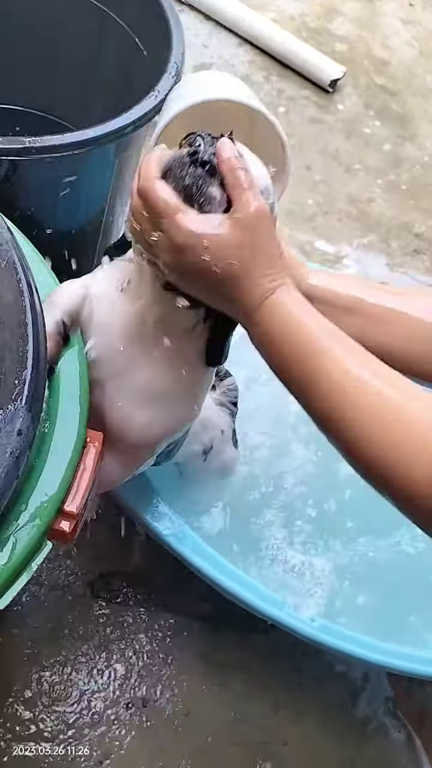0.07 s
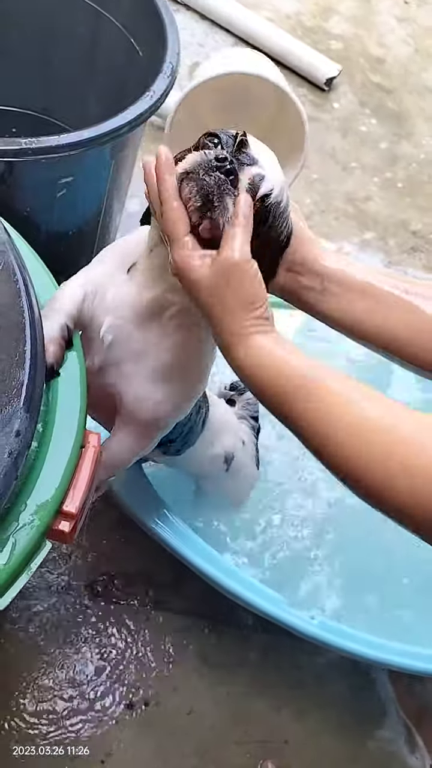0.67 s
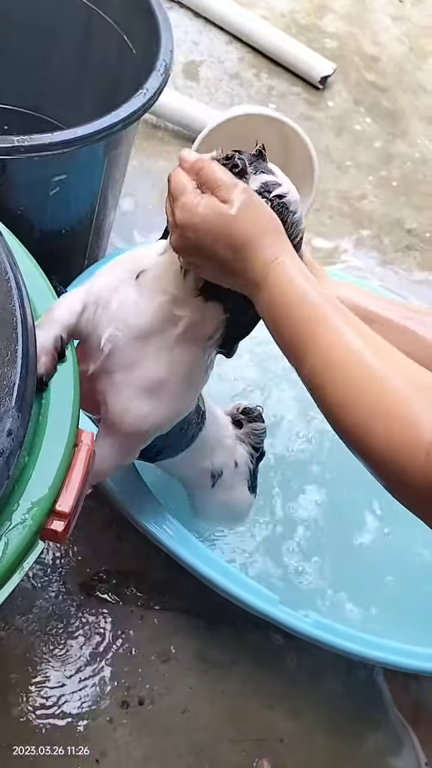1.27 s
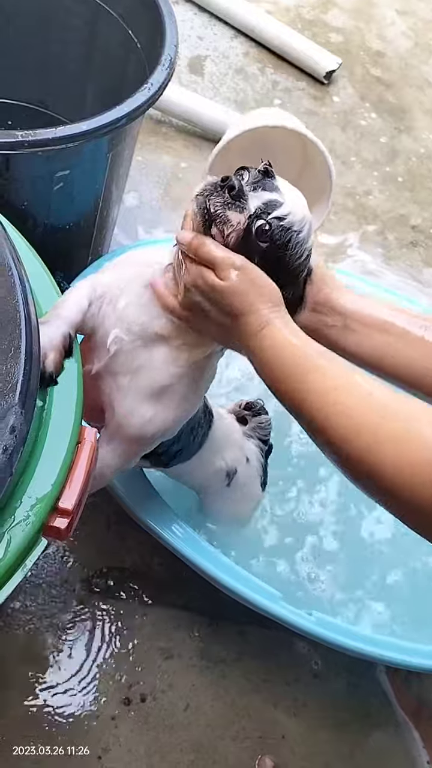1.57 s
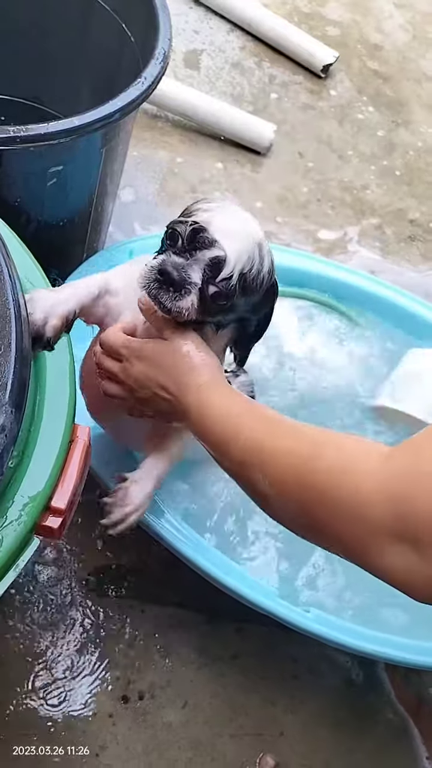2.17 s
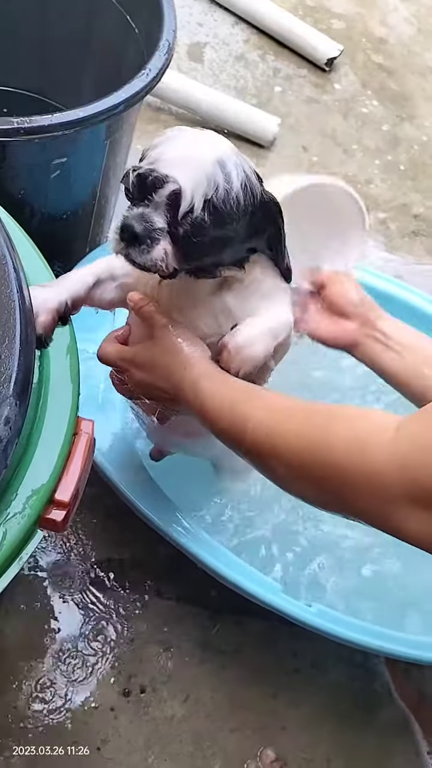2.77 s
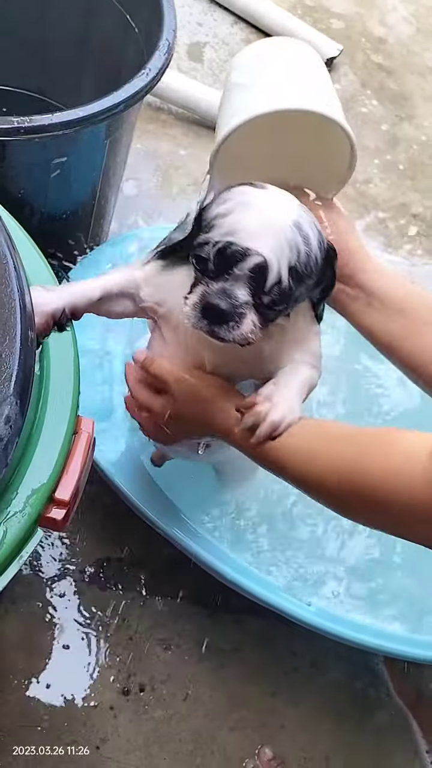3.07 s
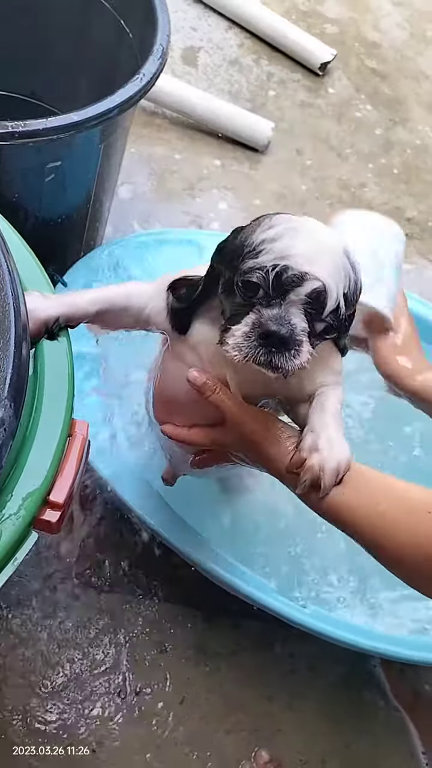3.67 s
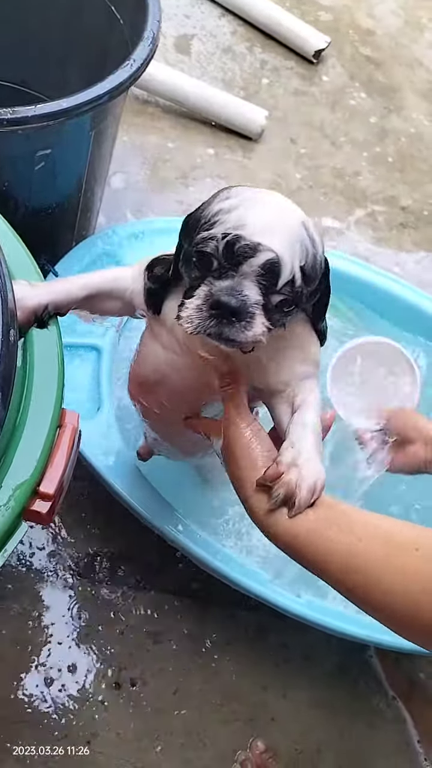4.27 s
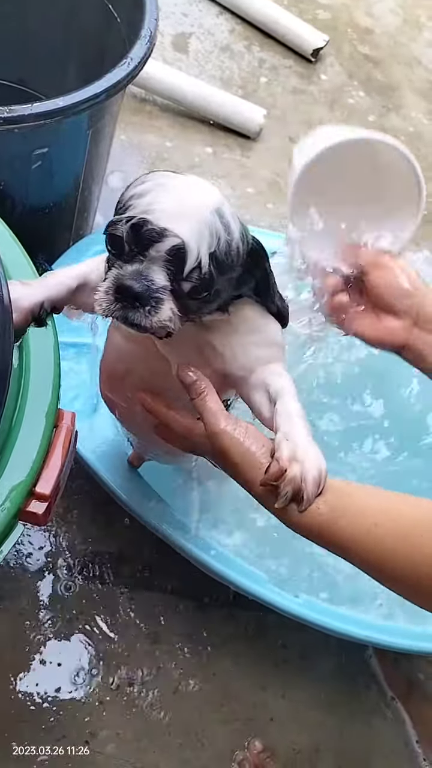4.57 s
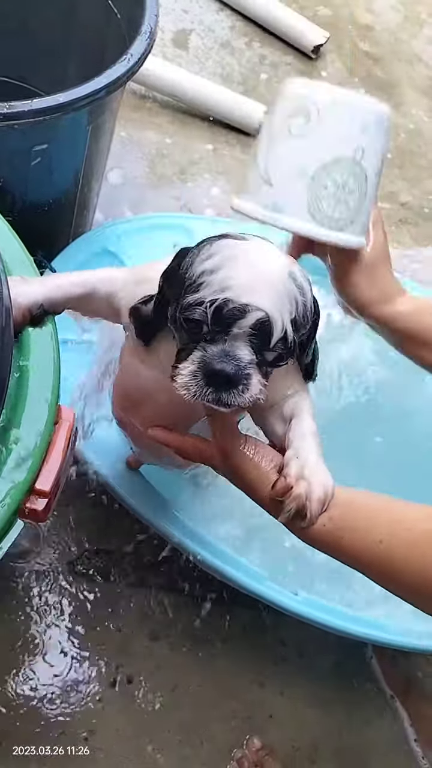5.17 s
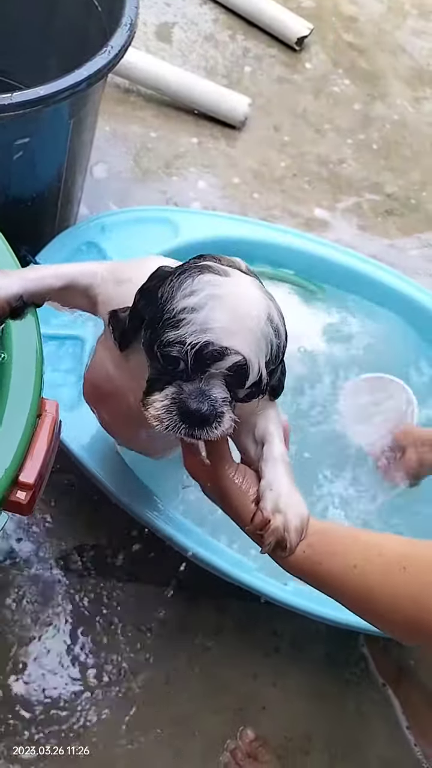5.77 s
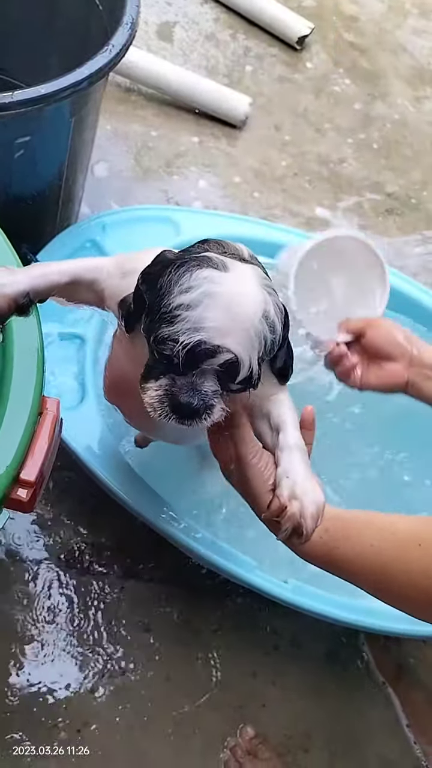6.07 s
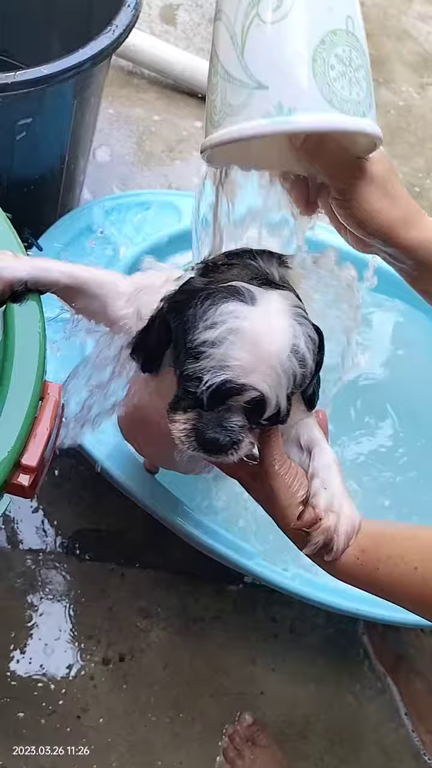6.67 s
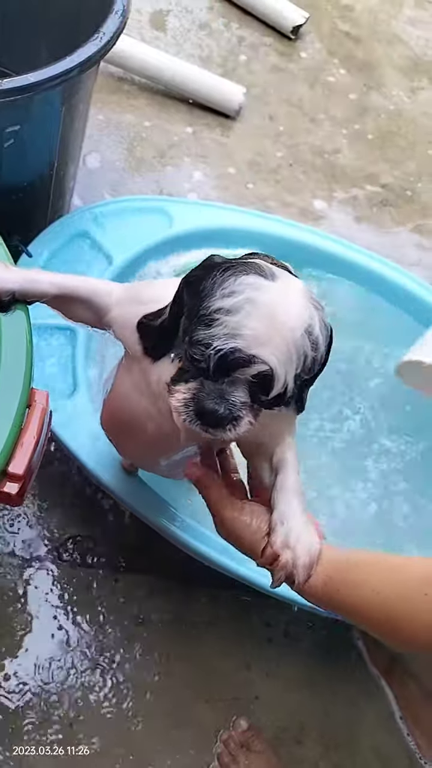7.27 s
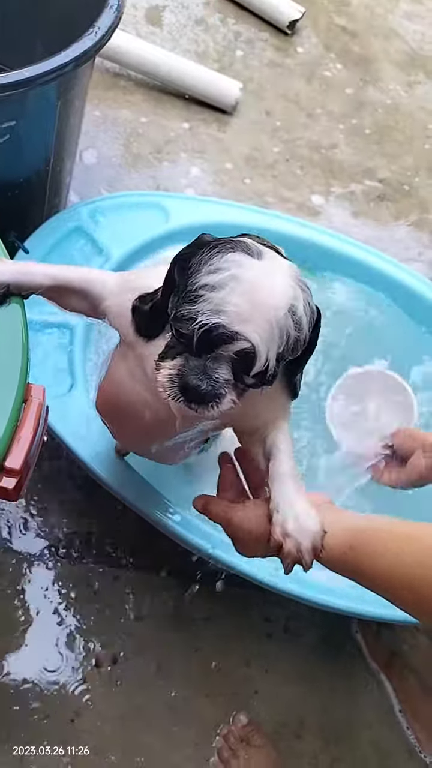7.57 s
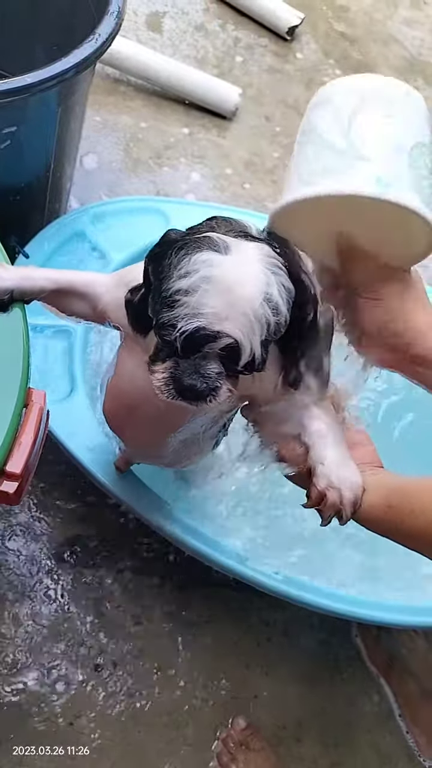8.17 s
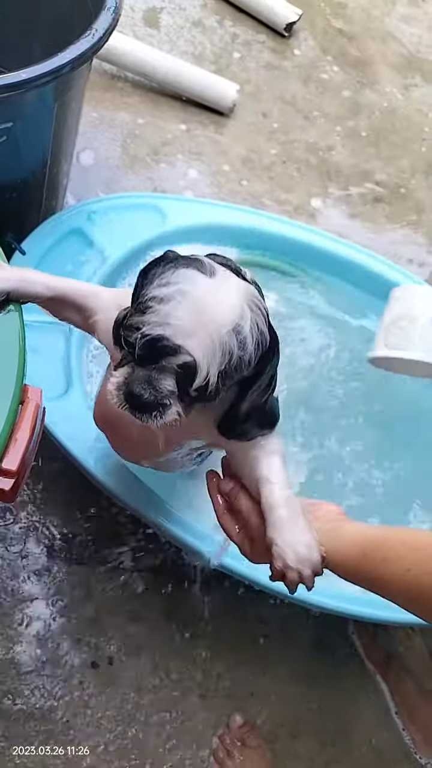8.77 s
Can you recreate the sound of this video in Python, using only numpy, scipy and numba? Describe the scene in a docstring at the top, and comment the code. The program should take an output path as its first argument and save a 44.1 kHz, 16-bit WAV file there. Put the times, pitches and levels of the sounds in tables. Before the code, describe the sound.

Wet hands squelch over fur, then water is scooped and poured into a plastic tub several times, splashing and dripping.

```python
"""Water trickles off a puppy and wet hands squelch over its fur, in a shallow plastic tub in a concrete yard.
Then a dipper is plunged into the tub and emptied over the dog four times; run-off drips in between.
Drops radiate by impact and by the bubbles they entrain. Each bubble is a damped oscillator, the
larger the lower, so that spray hisses and the heaving bath gurgles. The tub hums at its normal
modes, nearby surfaces reflect the splashes, and a faint outdoor murmur lies behind it all."""
import sys
import numpy as np
from scipy import signal
from scipy.fft import rfft, irfft
from scipy.io import wavfile
from scipy.ndimage import uniform_filter1d
from numba import njit

SR = 44100
rng = np.random.default_rng(int(sys.argv[2]) if len(sys.argv) > 2 else 0)


def store_wav(level_fs):
    """Save 16-bit WAV to argv[1]."""
    pcm = np.round(np.clip(np.atleast_2d(level_fs), -1, 1) * 32767)
    wavfile.write(sys.argv[1], SR, pcm.T.astype(np.int16))


N = 392931
TIME = np.arange(N) / SR


def from_db(db):
    return 10 ** (np.asarray(db) / 20)


def unit_rms(x):
    return x / np.sqrt(np.mean(x ** 2) + 1e-20)


def power_sum(*levels_db):
    """Incoherent sources add in power."""
    return 10 * np.log10(sum(from_db(db) ** 2 for db in levels_db) + 1e-12)


def add(out, start_s, sound):
    at = int(np.clip(start_s * SR, 0, N - 1))
    out[at:at + len(sound)] += sound[:N - at]


def butter(x, order, hz, kind):
    return signal.sosfilt(signal.butter(order, hz, kind, fs=SR, output="sos"), x)


def convolve(x, impulse):
    return signal.oaconvolve(x, impulse)[:len(x)]


def response(spectrum, size=1024):
    """Minimum-phase impulse response of unit energy, by folding the cepstrum."""
    hz, db = np.transpose(spectrum)
    grid = np.maximum(np.fft.rfftfreq(size, 1 / SR), 1)
    magnitude = from_db(np.interp(np.log(grid), np.log(hz), db))
    cepstrum = irfft(np.log(magnitude))
    cepstrum[1:size // 2] *= 2
    cepstrum[size // 2 + 1:] = 0
    return unit_rms(irfft(np.exp(rfft(cepstrum)))) / np.sqrt(size)


def evened(x, span_s):
    """Division by the running rms steadies the level and keeps the fine grain."""
    size = int(span_s * SR)
    power = uniform_filter1d(uniform_filter1d(x * x, size), size)
    return x / np.sqrt(np.abs(power) + 1e-12)


def drift(per_s):
    """Random modulation: Gaussian values joined by straight lines."""
    return np.interp(TIME * per_s, np.arange(4000), rng.standard_normal(4000))


def impacts(per_s, spread_db):
    """A Poisson process of clicks: many small, a few large."""
    sizes = from_db(spread_db * np.minimum(rng.exponential(1, N), 4.5)) * rng.choice([-1, 1], N)
    return sizes * (rng.random(N) < per_s / SR)


@njit
def rising_rings(clicks, step, cycles, rise):
    """Damped oscillation: each click starts a rising sine (step in rad/sample) that decays by 60 dB."""
    out = np.zeros(len(clicks))
    for at in np.nonzero(clicks)[0]:
        size = min(int(cycles * 2 * np.pi / step[at]) + 1, len(clicks) - at)
        height, loss = clicks[at] * np.sqrt(step[at]), np.exp(-np.log(1000) / size)
        for i in range(size):
            angle = step[at] * i
            onset = min(angle / (2 * np.pi), 1.0)
            out[at + i] += height * onset * np.sin(angle * (1 + rise * i / size / 2))
            height *= loss
    return out


def bubble_cloud(clicks, low_hz, high_hz, cycles, rise):
    """Minnaert resonance: each click traps a bubble of random size, and so of random pitch."""
    hz = low_hz * (high_hz / low_hz) ** rng.random(N)
    return rising_rings(clicks, 2 * np.pi * hz / SR, float(cycles), float(rise))


# Water running off dog and dipper: t/s, spray level/dB, gurgle level/dB, tick level/dB
RUNOFF_LEVELS = [(0.0, -41, -70, -53), (0.22, -51, -68, -57), (0.65, -62, -66, -68.5),
                 (1.1, -63.5, -78, -90), (2.08, -80, -70, -84), (2.15, -40, -57, -63),
                 (2.49, -45, -46, -70), (2.62, -43, -48, -60.5), (4.03, -39.5, -46.5, -66),
                 (4.22, -44.5, -45, -67), (4.45, -38.5, -47.5, -62.5), (4.95, -41.5, -76, -54),
                 (5.72, -44, -63, -63), (5.9, -46.5, -57.5, -76), (6.45, -47.5, -54, -61),
                 (7.42, -47.5, -55, -68), (7.95, -46, -51, -76), (8.91, -42.5, -65.5, -55)]
def runoff(dribble_db=3.0):
    """Unsteady flow: levels of spray, gurgle and ticks, with the spray fluctuating at random."""
    times, *columns = np.transpose(RUNOFF_LEVELS)
    spray_db, gurgle_db, tick_db = [np.interp(TIME, times, column) for column in columns]
    return spray_db + dribble_db * drift(18), gurgle_db, tick_db


# Spectral density of spattering water: f/Hz, level/dB
SPRAY_SPECTRUM = [(60, -49), (300, -11), (700, -15), (1300, -14), (1950, -7.5), (2600, -5.5), (3900, -2),
                  (4800, -5.5), (5900, -2), (7400, -6.5), (9400, -23), (11000, -17.5), (11900, -9),
                  (13000, -11), (15500, -4)]
def spray(spray_db):
    """Bubble entrainment by drops on water, fur and concrete; a stronger flow is denser and brighter."""
    per_s = 1200 * from_db(.65 * (spray_db + 40.5))
    pops = bubble_cloud(impacts(per_s, spread_db=7.5), 1130, 8220, cycles=18, rise=0.19)
    plinks = bubble_cloud(impacts(.5 * per_s, spread_db=4.0), 2267, 7800, cycles=32, rise=0.066)
    fizz = bubble_cloud(impacts(.5 * per_s, spread_db=5.0), 6800, 15870, cycles=4.8, rise=0.3)
    drops = unit_rms(plinks) + from_db(-2) * unit_rms(pops) + from_db(2) * unit_rms(fizz)
    colour = response(SPRAY_SPECTRUM)
    grains = evened(convolve(drops, colour), span_s=0.12)
    mist = from_db(-9) * convolve(rng.standard_normal(N), colour)
    water = (grains + mist) * from_db(0.87 * drift(130))  # the stream breaks into lumps
    treble = butter(water, 1, 6000, "high")
    treble_db = np.clip(spray_db + 19, -15, 5) + 2.5 * drift(45)  # the treble flickers
    return from_db(spray_db) * (water + treble * (from_db(treble_db) - 1))


# Spectral density of a droplet's impact: f/Hz, level/dB
TICK_SPECTRUM = [(200, -35), (2000, -56), (4000, -9), (5900, 8.5), (7400, 15), (9400, -8.5), (12000, 0.5),
                 (15500, -5)]
def ticks(tick_db):
    """Impact noise: stray droplets strike the wet concrete, more often at higher levels."""
    per_s = 60 * from_db(0.43 * (tick_db + 58))
    clicks = impacts(per_s, spread_db=2.0) / np.sqrt(per_s)
    return from_db(tick_db) * unit_rms(convolve(clicks, response(TICK_SPECTRUM)))


# Spectral density of the outdoor background: f/Hz, level/dB
MURMUR_SPECTRUM = [(20, -2), (60, -3), (110, 7), (200, 8), (300, 9), (600, 3), (1100, 1), (2000, -10),
                   (4000, -9), (7000, -17), (9500, -26), (15500, -23)]
def murmur(level_db=-59.5):
    """Stationary ambient noise, strongest at low frequencies."""
    return from_db(level_db) * convolve(rng.standard_normal(N), response(MURMUR_SPECTRUM, size=4096))


# Single drops and squelches: t/s, level over 10 ms/dB, centre f/Hz, bandwidth/octaves, T60/s
SPLAT_EVENTS = [(0.0085, -33.5, 4600, 0.43, 0.014), (0.1371, -27, 2950, 0.45, 0.013),
                (0.243, -47, 5970, 0.45, .02), (0.2975, -39.5, 4430, 0.34, 0.021),
                (0.3223, -33.5, 3240, 0.29, .02), (0.413, -38.5, 3870, 0.12, 0.011),
                (0.442, -42.5, 5840, 1, .018), (0.508, -45.5, 3550, .7, .03),
                (0.565, -44.5, 5640, 1.1, 0.011), (0.7923, -51, 2010, 2.4, 0.019),
                (0.845, -46, 3060, 0.72, 0.02), (1.048, -45.5, 7030, .2, .037),
                (1.306, -36.5, 5600, 0.62, .013), (1.397, -50, 5460, 2.1, 0.077),
                (1.4215, -38.5, 5530, 0.77, 0.039), (1.5374, -55, 5410, 0.83, 0.025),
                (1.715, -45, 2200, 1.8, 0.036), (1.9052, -43, 6100, .5, 0.028),
                (2.0045, -56, 6000, 0.28, 0.017), (2.0763, -47, 6500, 0.56, .02),
                (2.1331, -33, 3500, 0.57, 0.017), (2.219, -29.5, 3060, 0.64, 0.025),
                (2.251, -30, 5580, 0.6, 0.014), (2.327, -35.5, 2950, 0.75, .044),
                (2.3555, -27.5, 3420, 3.2, 0.085), (2.382, -24.5, 2900, 1.3, 0.046),
                (2.5494, -32, 2780, 0.95, 0.016), (2.595, -31, 3860, 1.3, .04),
                (2.612, -29, 1900, 0.95, 0.014), (3.4062, -30, 3190, 1.4, 0.049),
                (3.5327, -24, 3750, 0.99, 0.023), (3.6795, -24, 4000, 1, .03),
                (3.7234, -24, 3000, 2.7, 0.032), (3.757, -25.5, 4120, 1.3, 0.017),
                (4.027, -30, 3530, 1, .01), (4.0759, -25.5, 3500, 2.8, 0.17),
                (4.297, -29.5, 2980, 0.91, 0.011), (4.3902, -37.5, 1770, 0.27, 0.025),
                (4.513, -34, 2620, 0.55, 0.028), (4.852, -31, 3470, 0.33, 0.019),
                (4.8862, -31.5, 3550, 1.1, 0.018), (4.981, -41, 3120, 1.5, .028),
                (5.0902, -23, 4070, 0.73, 0.011), (5.1811, -29, 3380, 0.95, 0.033),
                (5.3935, -26.5, 4290, 1.2, 0.038), (5.5076, -30, 2970, 1.7, .054),
                (5.741, -31.5, 3300, 1.7, 0.094), (5.785, -27, 4300, 0.82, 0.027),
                (5.9963, -36, 5500, 0.5, 0.027), (6.467, -46, 2740, 0.2, 0.019),
                (6.5173, -40.5, 3600, 0.85, .036), (6.5966, -34, 3900, 0.39, 0.0084),
                (6.645, -35, 2240, 1, 0.11), (6.714, -33, 2250, 0.87, 0.038), (6.748, -29, 4240, .7, 0.026),
                (6.945, -20.5, 4350, .9, .009), (7.0074, -24.5, 3660, 0.34, 0.0065),
                (7.057, -23, 4600, 0.83, 0.022), (7.345, -38, 3700, 0.95, 0.037),
                (7.4885, -31.5, 2950, 2, 0.07), (7.5123, -33, 4930, .6, 0.054),
                (7.6801, -42.5, 2740, 2, .03), (7.824, -36.5, 2470, 0.95, 0.47),
                (7.9031, -40.5, 2380, 1, .014), (8.131, -33.5, 3300, 1.2, 0.17),
                (8.203, -37, 5000, 1.2, 0.043), (8.2154, -27, 4440, 0.77, 0.023),
                (8.266, -32, 4280, .6, 0.016), (8.5065, -20, 2820, 1.2, 0.081),
                (8.6573, -29, 3180, 2, .028), (8.704, -24.5, 2600, 1.2, .015),
                (8.7667, -23.5, 4030, 0.92, 0.02), (8.8087, -28.5, 3300, 1.6, 0.025),
                (8.882, -34.5, 4740, .7, 0.029)]
def splats(attack_share=0.035, crack_db=-6.5, lumpy_db=3.5):
    """Transient radiation: a drop or a squeezed film of water bursts with a crack and an uneven rush."""
    out, t, colour = np.zeros(N), np.arange(4096) / SR, response(SPRAY_SPECTRUM)
    for start, db, hz, octaves, t60 in SPLAT_EVENTS:
        lumps = from_db(lumpy_db * np.interp(t, np.linspace(0, t[-1], 90), rng.standard_normal(90)))
        envelope = (1 - np.exp(-t / (attack_share * t60))) * from_db(-60 * t / t60)
        rush, snap = rng.standard_normal((2, len(t))) * lumps * envelope
        edges_hz = np.clip(hz * 2 ** (np.array([-.5, .5]) * max(octaves, .15)), 100, SR / 2.3)
        body = butter(convolve(rush, colour), 2, edges_hz, "band")
        crack = convolve(snap, response(TICK_SPECTRUM))
        sharpness = hz / 4000 * np.clip(octaves, .2, 1)  # low or ringing drops hardly crack
        burst = unit_rms(body) + from_db(crack_db) * sharpness * unit_rms(crack)
        add(out, start, from_db(db) * burst / np.linalg.norm(burst) * np.sqrt(SR / 100))
    return out


def gesture(peak_s, hold_s, swell_db_per_s, fade_db_per_s):
    """Exponential growth, a hold and exponential decay, in dB relative to the peak."""
    before, after = np.maximum(peak_s - TIME, 0), np.maximum(TIME - peak_s - hold_s, 0)
    return -swell_db_per_s * before - fade_db_per_s * after


# Heaves of the bath: t/s, gurgle level/dB, slosh level/dB, hum level/dB, decay/(dB/s)
HEAVE_EVENTS = [(0.02, -72, -58, -52, 17), (0.57, -60.5, -64, -73, 48), (2.358, -44, -47, -59, 55),
                (2.64, -39.5, -59, -55, 39), (3.07, -45, -67, -76, 47), (4.085, -44.5, -46.5, -56, 89),
                (4.469, -54, -78, -54, 4), (5.77, -47.5, -46, -49, 62), (7.479, -41, -43.5, -48.5, 56),
                (8.33, -53, -71, -51.5, 21), (8.57, -42.5, -44, -63, 77)]
def heaving(hold_s=0.026, swell_db_per_s=650):
    """Free decay: gurgle, slosh and hum levels jump as the dipper plunges or the dog shifts, then sink."""
    shapes = [gesture(peak_s, hold_s, swell_db_per_s, fade) for peak_s, *_, fade in HEAVE_EVENTS]
    columns = np.transpose(HEAVE_EVENTS)[1:-1]
    return [power_sum(*[db + shape for db, shape in zip(levels, shapes)]) for levels in columns]


def churn(churn_db):
    """Air entrainment: moving water drags under a gurgling cloud of middle-sized bubbles."""
    clicks = impacts(400 * from_db(.5 * (churn_db + 45.5)), spread_db=3.0)
    return gurgle(clicks) * from_db(churn_db - 0.5)


# Spectral weighting of the gurgling bubbles: f/Hz, level/dB
GURGLE_SPECTRUM = [(80, -38), (350, -43), (600, -9.5), (900, -7), (1400, -2), (1900, -16.5), (3000, -30.5)]
def gurgle(clicks):
    """Superposition: overlapping bubble resonances merge into a gurgle of steady level."""
    cloud = bubble_cloud(clicks, 519.6, 2088, cycles=44.7, rise=0.24)
    return evened(convolve(cloud, response(GURGLE_SPECTRUM)), span_s=0.32)


def slosh(slosh_db):
    """Cavity resonance: waves fold over large pockets of air, which ring low."""
    cloud = bubble_cloud(impacts(240, spread_db=6.0), 281.4, 566, cycles=37, rise=0.071)
    return from_db(slosh_db) * evened(butter(cloud, 2, 270, "high"), span_s=0.29)


# Normal modes of the hollow tub: f/Hz, bandwidth/Hz, level/dB
TUB_MODES = [(205, 23, -2), (112.3, 6.4, -18)]
def tub(hum_db):
    """Forced vibration: rocking water drives each mode, a two-pole resonator, with noise."""
    hum = np.zeros(N)
    for hz, width_hz, db in TUB_MODES:
        radius, angle = np.exp(-np.pi * width_hz / SR), 2 * np.pi * hz / SR
        gain = np.sin(angle) * np.sqrt(1 - radius ** 2)
        feedback = [1, -2 * radius * np.cos(angle), radius ** 2]
        mode = signal.lfilter([gain], feedback, rng.standard_normal(N))
        hum += from_db(db) * evened(mode, span_s=0.36)
    return from_db(hum_db) * butter(hum, 4, 112, "high")


# Single large bubbles: t/s, peak level/dB, f/Hz, T60/cycles, fractional rise in f
BUBBLE_EVENTS = [(0.137, -23, 2036, 45, 1.4), (0.44, -53, 563, 68, 1.7), (0.47, -50, 1216, 85, 1.2),
                 (0.575, -44.5, 550, 54, 0), (0.588, -43, 958, 110, 0), (0.652, -45.5, 578, 56, 0),
                 (0.798, -39, 1390, 19, 0.084), (1.219, -42.5, 1210, 37, 0.14),
                 (1.72, -37.5, 1350, 30, 2.8), (1.859, -32.5, 1173, 48, 1.7), (1.862, -39, 380, 28, 0.59),
                 (1.863, -27, 710, 11, .3), (1.883, -35, 1036, 40, 0.023), (2.326, -28.5, 402.5, 130, 0.29),
                 (2.357, -16.5, 415.6, 51, 0), (2.37, -14, 455, 25, 0.56), (2.41, -24.5, 543, 39, .3),
                 (2.607, -30, 406, 40, 0.052), (2.611, -22, 1356, 38, 0.29), (2.655, -25.5, 950, 29, 0.17),
                 (2.705, -19.5, 1030, 47, 0), (2.759, -28.5, 1360, 55, 0.77), (2.882, -38, 408, 33, 0.39),
                 (2.899, -28, 628, 38, 0.061), (3.082, -27, 654, 30, 0), (3.43, -31.5, 583, 64, 0),
                 (3.597, -38, 398, 73, 0.57), (3.725, -18, 1590, 28, 2.5), (3.789, -32, 373, 25, .3),
                 (4.072, -28.5, 344, 27, 0.98), (4.073, -15.5, 581, 31, 0.54), (4.389, -33, 1760, 49, 0.58),
                 (4.485, -33, 557, 47, 0), (4.6, -33.5, 1180, 26, 0), (4.626, -37.5, 870, 89, 0),
                 (4.741, -35.5, 1310, 45, 0.83), (4.868, -32.5, 1007, 74, 0.11),
                 (4.942, -27, 892, 34, 0.074), (5.16, -26.5, 1015, 77, 0.042), (5.581, -35, 1370, 41, 0.45),
                 (5.751, -33.5, 1388, 45, 0.43), (5.739, -33.5, 490, 8, 0.26), (5.783, -30, 520, 19, 0.6),
                 (5.827, -28, 560, 15, 0), (5.935, -19, 614, 13, 0.094), (6.253, -35.5, 1170, 110, 0.66),
                 (6.262, -36, 800, 79, 1.4), (6.417, -34.5, 980, 37, .1), (6.653, -33.5, 940, 64, 0.66),
                 (6.718, -20.5, 709, 114, 0.018), (6.755, -29, 962, 47, 0.0022),
                 (6.923, -10.5, 1454, 14, 0), (7, -33, 354, 36, 0.082), (7.461, -28, 684, 36, 0.35),
                 (7.514, -36, 414, 12, 0.17), (7.568, -29, 880, 50, 0.91), (7.622, -32.5, 537, 54, 0.85),
                 (7.667, -30, 1260, 77, .4), (8.294, -22.5, 907, 17, 0.12), (8.506, -20, 1325, 34, 1),
                 (8.542, -18.5, 1594, 29, 0.29), (8.628, -20.5, 1194, 64, 1.33)]
def bubbles(opening_cycles=0.77, wobble_rad=.13, wash_db=-13.0, wash_t60=0.18):
    """Volume pulsation: a bubble rings, wobbles and rises; water closing over it washes near its pitch."""
    out, t = np.zeros(N), np.arange(SR // 4) / SR
    for start, db, hz, cycles, rise in BUBBLE_EVENTS:
        t60, opening_s = cycles / hz, opening_cycles / hz + 1 / 600
        envelope = from_db(-60 * t / t60) * (1 - np.exp(-(t / opening_s) ** 2))
        glide_hz = hz * (1 + rise * (np.minimum(t / t60, 1) - .13))
        wobble = wobble_rad * np.interp(t * hz / 2, np.arange(300), rng.standard_normal(300))
        note = envelope / envelope.max() * np.sin(2 * np.pi * np.cumsum(glide_hz) / SR + wobble)
        rush = rng.standard_normal(len(t)) * from_db(-60 * t / wash_t60)
        wash = butter(rush, 2, [hz * .8, hz * 1.35], "band")
        wash *= from_db(wash_db) * np.linalg.norm(note) / np.linalg.norm(wash)
        add(out, start - .001, from_db(db) * (note + wash))
    return out


# Pours from the dipper: t/s at full stream, hold/s, level/dB, growth/(dB/s), decay/(dB/s)
POUR_EVENTS = [(3.519, 0.29, -25.5, 21, 91), (5.269, .12, -26, 46.5, 69), (6.879, 0.2, -24.5, 86, 165),
               (8.482, 0.21, -25, 70, 131)]
def pouring(sag_db_per_s=5):
    """Gravity flow: the spray level swells as the dipper tips, sags as it empties, then breaks off."""
    pours = [db + gesture(full_s, hold_s, swell, fade) - sag_db_per_s * np.clip(TIME - full_s, 0, hold_s)
             for full_s, hold_s, db, swell, fade in POUR_EVENTS]
    return power_sum(*pours)


# Early reflections from tub wall and ground: delay/s, amplitude ratio
REFLECTIONS = [(.00052, 0.088), (.00228, 0.43), (.0046, .14), (.0092, 0.12)]
def yard(water, t60=0.15, wet_db=0.5, onset_s=0.00067, spots_per_s=23, spots=8):
    """Reflection and scattering: near echoes, then a diffuse tail that varies with where water lands."""
    t = np.arange(SR // 4) / SR
    near = np.zeros(len(t))
    near[0] = 1
    for delay_s, gain in REFLECTIONS:
        near[int(delay_s * SR)] += gain
    out = convolve(water, near)
    for spot in range(spots):
        tail = rng.standard_normal(len(t)) * from_db(-60 * t / t60) * (1 - np.exp(-t / onset_s))
        scatter = from_db(wet_db) * butter(tail / np.linalg.norm(tail), 1, [900, 6000], "band")
        share = np.maximum(1 - np.abs((TIME * spots_per_s - spot) % spots - 1), 0)  # spots cross-fade
        out += convolve(water * np.sqrt(share), scatter)
    return out / np.sqrt(np.sum(near ** 2) + np.sum(scatter ** 2))


def scene(gulp_db=3.5):
    """Superposition: run-off, heaves and pours together drive the water and the tub."""
    dribble_db, gurgle_db, drip_db = runoff()
    heave_db, rock_db, boom_db = heaving()
    pour_db = pouring()
    spray_db = power_sum(pour_db, dribble_db)
    tick_db = power_sum(pour_db - 23, drip_db)  # droplets thrown clear of the stream
    churn_db = power_sum(pour_db - 12, heave_db, gurgle_db) + gulp_db * drift(16)
    slosh_db = power_sum(pour_db - 31.5, rock_db, gurgle_db - 24.5)
    hum_db = power_sum(boom_db, -63.5 + 0.45 * (gurgle_db + 55.5))  # the hum partly follows the gurgle
    water = spray(spray_db) + ticks(tick_db) + churn(churn_db) + slosh(slosh_db) + splats() + bubbles()
    water = butter(water, 2, 170, "high")  # splashes carry no bass
    return (murmur() + yard(water) + tub(hum_db))[None]


def record(dry, cutoff_hz=15900):
    """Band limiting: an elliptic low-pass cuts the top steeply."""
    return signal.sosfilt(signal.ellip(12, .2, 80, cutoff_hz, fs=SR, output="sos"), dry)


dry = scene()
out = record(dry)
store_wav(out)
```